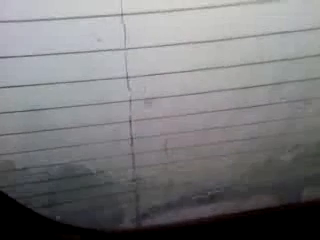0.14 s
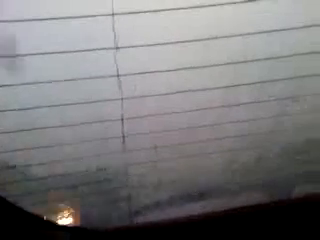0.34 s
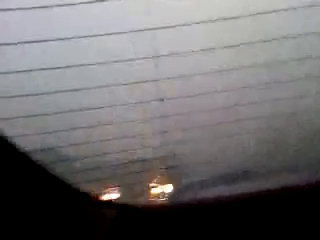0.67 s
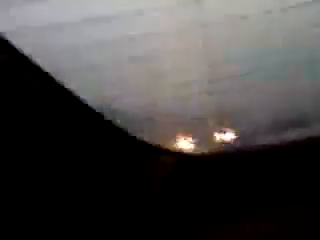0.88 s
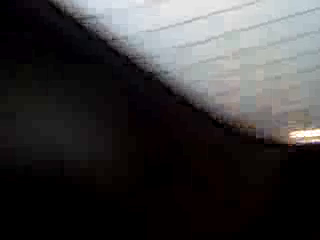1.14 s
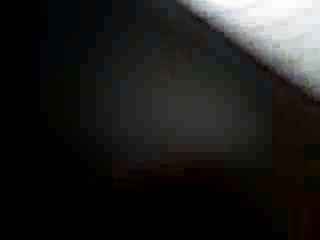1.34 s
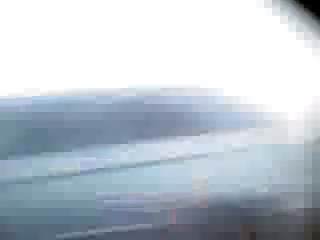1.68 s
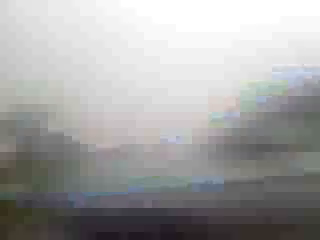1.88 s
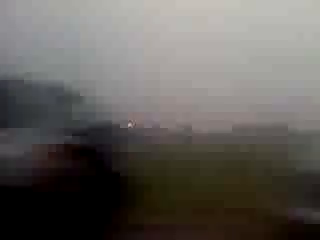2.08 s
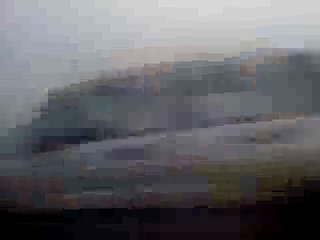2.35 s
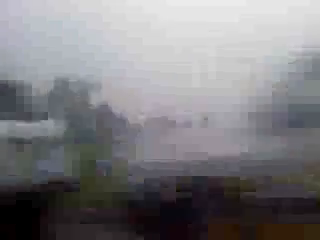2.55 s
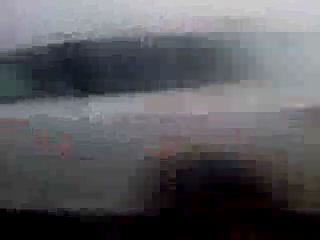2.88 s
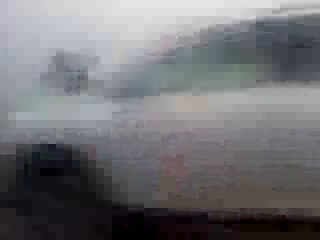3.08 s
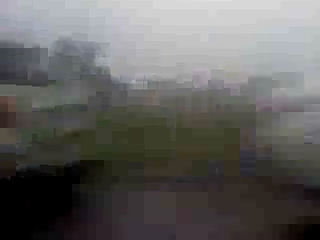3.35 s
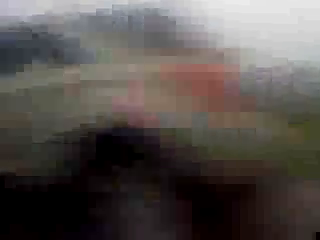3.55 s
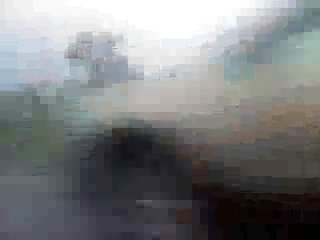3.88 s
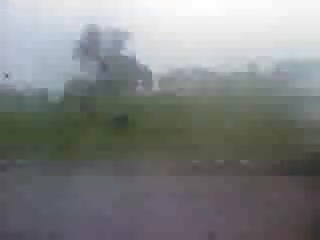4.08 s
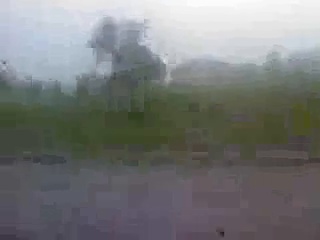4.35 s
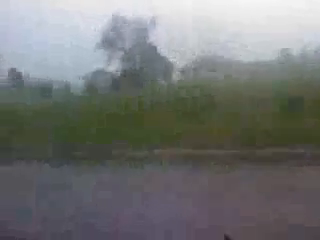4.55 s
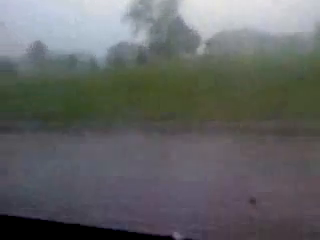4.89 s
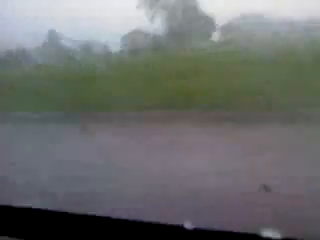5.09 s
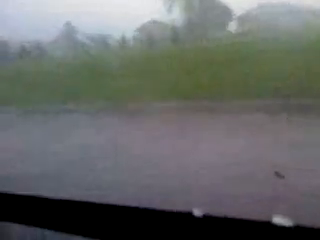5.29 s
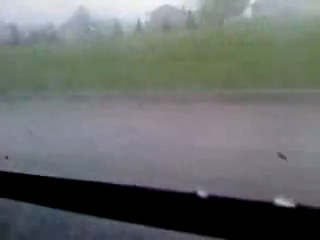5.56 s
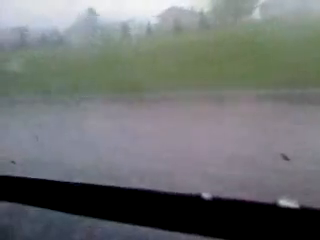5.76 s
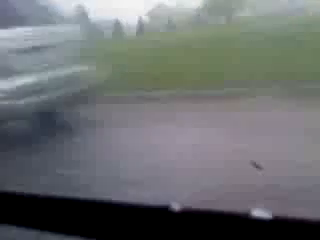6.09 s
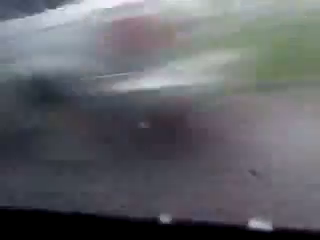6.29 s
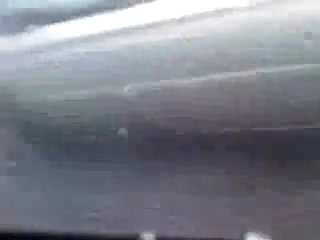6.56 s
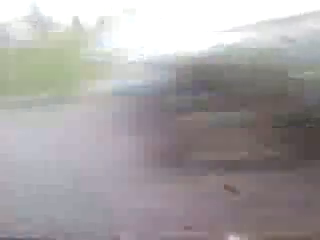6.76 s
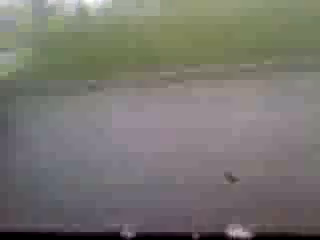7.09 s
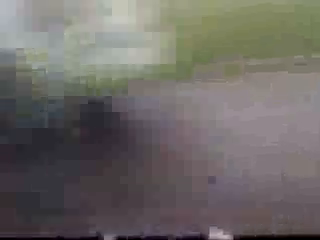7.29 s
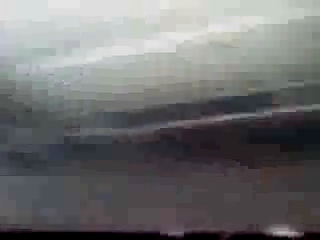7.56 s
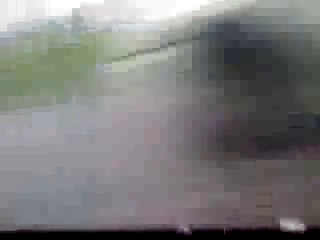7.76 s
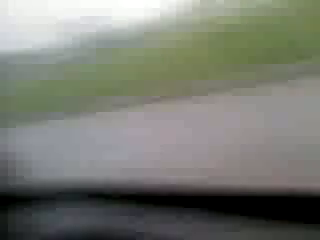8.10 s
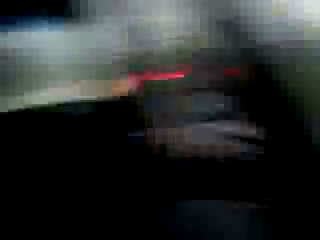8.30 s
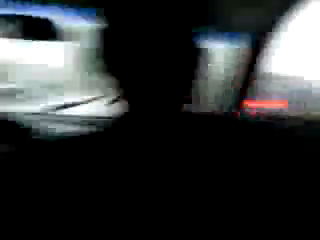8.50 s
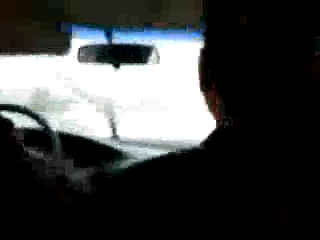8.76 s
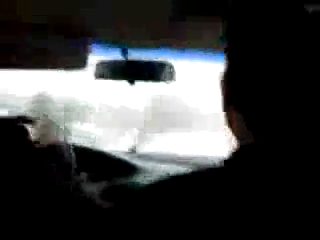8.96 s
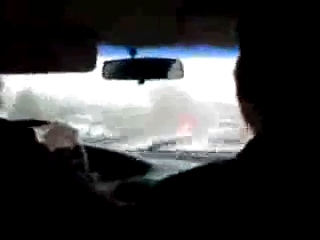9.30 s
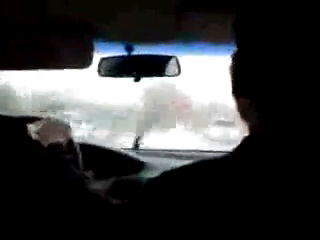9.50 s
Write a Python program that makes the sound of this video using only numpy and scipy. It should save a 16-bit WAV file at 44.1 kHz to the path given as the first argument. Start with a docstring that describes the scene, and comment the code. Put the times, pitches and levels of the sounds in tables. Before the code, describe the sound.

Inside a car during hail: dense, irregular hard clacks on window and roof, around twenty a second, some sharp and bright, others dull thuds that leave the sheet metal humming briefly. Tiny pellets patter in between. Beneath lies a fluttering rain hiss with low road rumble. The microphone sits in the small, boxy cabin; the sound is dull, with little high treble, and the hardest hits crackle slightly.

```python
"""Hail and rain on a car

Heard inside the car, dull and narrow in band. Each stone clacks on glass or roof as
a noise burst shaped by spectrum and decay, and sets a low sine mode of the sheet metal humming.
Resonators and a noise tail make the cabin ring briefly. Small random pellets patter in between,
over one filtered, fluttering noise that holds both the hiss of rain and a low road rumble."""
import sys
import numpy as np
from scipy import signal
from scipy.fft import rfft, irfft, next_fast_len
from scipy.io import wavfile
from scipy.ndimage import uniform_filter1d

SR = 44100
rng = np.random.default_rng(int(sys.argv[2]) if len(sys.argv) > 2 else 0)


def waveform_to_disk(signal):
    """Save audio, clipped to [-1, 1], as 16-bit WAV at the path in sys.argv[1]."""
    frames = np.transpose(np.atleast_2d(signal))
    scaled = np.clip(frames, -1, 1) * 32767
    samples = np.round(scaled).astype(np.int16)
    wavfile.write(sys.argv[1], SR, samples)


N = 425106
STEP = 4  # the layers run at a quarter of SR, as next to nothing sounds above 4.75 kHz
RATE = SR / STEP
SLOW_N = N // STEP + 1


def amp(db):
    """Decibels to gain."""
    return 10 ** (np.asarray(db) / 20)


def evened(x):
    """Scales to rms 1."""
    return x / np.sqrt(np.mean(x ** 2) + 1e-20)


def read(points, hz):
    """Reads a (f/Hz, value) table on a log-frequency axis."""
    f, value = np.transpose(points)
    return np.interp(np.log(hz + 1), np.log(f + 1), value)


def coloured(x, points, rate):
    """Filters by a (f/Hz, gain/dB) table."""
    size = next_fast_len(len(x) + 4096)
    gain = amp(read(points, np.fft.rfftfreq(size, 1 / rate)))
    return irfft(rfft(x, size) * gain, size)[:len(x)]


def add(mix, s, sound):
    """Mixes a sound in at time s, trimmed to the ends of the mix."""
    start = round(s * RATE)
    sound = sound[max(-start, 0):]
    part = mix[max(start, 0):][:len(sound)]
    part += sound[:len(part)]


def wobble(size, span):
    """Smooth chance of rms 1 that changes over about span samples."""
    spectrum = rfft(rng.standard_normal(size))
    smoothing = np.exp(-(np.fft.rfftfreq(size) * span) ** 2)
    return evened(irfft(spectrum * smoothing, size))


def blows(rows, clack_width_hz=1080, skirt=3.32, thud_hz=253, thud_width_hz=250,
          spread=0.19, direct_level=0.12, swell=1.954, fall=1.28, lag_s=0.002,
          push_db=-8, push_hz=110, attack_s=0.00029, clump=0.36, clump_s=0.0034,
          patchy_db=3.5, patch_hz=330, size=1536, count=18):
    """Each stone launches bending waves that return from the panel edges as a burst of uneven echoes."""
    t, hz = np.arange(1, size + 1) / RATE, np.fft.rfftfreq(size, 1 / RATE)
    # overlapping bands, each with its own decay
    centres = np.geomspace(150, 4400, count)
    bands = np.array([np.interp(hz, centres, row) for row in np.eye(count)])
    centres = centres[:, None]

    # low bending waves travel slower: they swell later and last longer, so each blow sweeps downward
    # below 1500 Hz they also set in later, by the square root of their period
    travel = np.maximum(np.sqrt(1500 / centres) - 1, 0)
    arrived = np.maximum(t - lag_s * travel, 0)
    slowed = arrived * (centres / 2000) ** spread
    rising, falling = slowed ** swell, slowed ** fall
    onset = 1 - np.exp(-t / attack_s)
    # the treble arrives at once, straight from the point of contact
    direct = direct_level * np.minimum(centres / 2000, 1)

    mix = np.zeros(SLOW_N)
    for s, db, clack_hz, thud_db, ring in rows:
        # the echoes arrive in clumps a millisecond or two long
        echoes = rng.choice([-1, 1], size) * np.exp(clump * wobble(size, clump_s * RATE))
        # a short, hard contact clacks high; a heavy stone also pushes the whole panel
        clack = (1 + ((hz - clack_hz) / clack_width_hz) ** 2) ** -skirt
        thud = amp(thud_db) ** 2 / (1 + ((hz - thud_hz) / thud_width_hz) ** 2)
        # the deepest bass is the momentum of the stone alone, whatever the thud of the panel
        deep = 1 / (1 + (hz / push_hz) ** 2)
        push = deep ** 2 * amp(push_db) ** 2
        colour = bands * np.sqrt(clack + (1 - deep) * thud + push)
        # every landing spot favours its own groups of modes
        spot = amp(patchy_db * wobble(len(hz), patch_hz / hz[1]))

        decay = np.exp(-np.minimum(falling / ring ** fall, 50))
        life = onset * np.sqrt((direct + rising / ring ** swell) * decay)
        sound = (irfft(colour * spot * rfft(echoes), size) * life).sum(0)
        # set the level from the expected power, so chance does not change the strength
        power = (colour * colour.sum(0)).mean(1) @ (life ** 2).mean(1)
        add(mix, s, amp(db) * np.sqrt(power) * evened(sound))
    return mix


def roof(rows, db=-10, limit_db=-8, build_s=.011, lag_s=.006, size=2400):
    """Each thud leaves a low roof mode humming; the stiff sheet yields little more to the heaviest."""
    # low modes of the roof, one drawn for each landing spot: (f/Hz, t60/s)
    roof_modes = [(236, 0.13), (252, 0.27), (280, 0.13), (303, 0.34), (314, 0.2), (330, 0.1), (352, 0.2),
                  (406, 0.038), (466, 0.12), (502, 0.081)]
    t, mix = np.arange(size) / RATE, np.zeros(SLOW_N)
    for (s, stone_db, _, thud_db, _), (spot, phase) in zip(rows, rng.random((len(rows), 2))):
        hz, t60 = roof_modes[int(spot * len(roof_modes))]
        ringing = np.sin(2 * np.pi * (hz * t + phase)) * amp(-60 * t / t60)
        swing = amp(limit_db) * np.tanh(amp(stone_db + thud_db - limit_db))
        add(mix, s + lag_s, amp(db) * swing * (1 - np.exp(-t / build_s)) * ringing)
    return mix


def pellets(per_s=34, low_hz=1700, high_hz=3630, db=-34.5, scatter_db=3.5, thud_db=-10, ring=0.0055):
    """Small ice grains land at random, each with its own clack; the larger they are, the rarer."""
    count = int(per_s * N / SR)
    when, chance, pitch = rng.random((count, 3)).T
    grain = np.minimum(-np.log(1 - chance), 2)
    clack_hz = low_hz + (high_hz - low_hz) * pitch
    same = np.ones(count)
    return np.transpose([when * N / SR, db + scatter_db * grain, clack_hz, thud_db * same, ring * same])


def boom(x):
    """The air under the roof rings on at its low modes after the blows."""
    # resonances of the cabin air: (f/Hz, width/Hz, level/dB)
    air_modes = [(254, 49, -16.5), (312, 50, -6.5), (504, 53, -4)]
    mix = np.zeros(len(x))
    for hz, width, db in air_modes:
        b, a = signal.iirpeak(hz, hz / width, fs=RATE)
        mix += amp(db) * signal.lfilter(b, a, x)
    return mix


def cabin(x, size=4096, build_s=0.0015):
    """A short, dense tail of noise, soaked up by the seats at a rate that depends on frequency."""
    # reverberation time of the cabin: (f/Hz, t60/s)
    cabin_t60 = [(150, 0.25), (400, 0.13), (1200, 0.031), (3500, 0.046)]
    hz, t, z = signal.stft(rng.standard_normal(size), RATE, nperseg=64)
    decay = amp(-60 * t / read(cabin_t60, hz)[:, None])
    tail = signal.istft(z * decay, RATE)[1]
    tail *= 1 - np.exp(-np.arange(len(tail)) / RATE / build_s)
    return signal.fftconvolve(x, tail / np.linalg.norm(tail))[:len(x)]


def rain(flutter_db=4.55):
    """Countless drops merge into a fluttering hiss; the same noise holds the rumble of the road."""
    # spectrum of rain and road, relative: (f/Hz, density/dB)
    wash_tone = [(25, -3.5), (80, -9), (160, -1), (290, 3.5), (450, -3.5), (800, -7.5), (1400, -2.5),
                 (2100, -1), (2800, -1.5), (3400, -2), (4000, -9)]
    # strength of this wash before flutter: (t/s, level/dB)
    rain_level = [(0, -36.5), (1.501, -37.5), (1.8, -39), (3.2, -38.5), (5, -36), (6.8, -37), (7.601, -40),
                  (8.75, -39), (9.3, -44.5), (9.64, -39.5)]
    sizes = np.exp(.45 * rng.standard_normal(SLOW_N))
    drops = sizes * rng.standard_normal(SLOW_N)
    flutter = evened(uniform_filter1d(rng.standard_normal(SLOW_N), size=250))  # over about 23 ms
    level_db = np.interp(np.arange(SLOW_N) / RATE, *np.transpose(rain_level))
    return evened(coloured(drops, wash_tone, RATE)) * amp(level_db + flutter_db * flutter)


def scene():
    """Stones and pellets sound through the car body, over the rain."""
    # one row a hailstone, before the body colours it:
    # (t/s, strength/dB, clack centre f/Hz, panel thud re clack level/dB, ring time at 2 kHz t/s)
    stones = [(-0.005, -17, 496, 20, 0.009), (0.02, -11, 1300, 4.5, 0.015),
              (0.061, -10.5, 2750, -4.5, 0.01), (0.14, -10.5, 2700, -6, 0.01),
              (0.211, -11.5, 1620, -11, 0.0098), (0.22, -12.5, 2920, -22, 0.015),
              (0.312, -10.5, 2780, -3.5, 0.0099), (0.368, -7.5, 1900, -17, 0.011),
              (0.426, -10, 3040, 1, 0.0099), (0.502, -7, 2100, -4, 0.011), (0.525, -1.5, 3070, -18, 0.0058),
              (0.548, -23, 750, 15, 0.0096), (0.564, -11, 2800, -17.5, 0.0065),
              (0.591, -15, 2930, -9.5, 0.014), (0.63, -7.5, 3180, -3, 0.017),
              (0.657, -7.5, 1700, -30, 0.011), (0.722, -11.5, 3100, -3, 0.0094),
              (0.744, -12.5, 1600, 11.5, 0.015), (0.766, -19, 3070, -2.5, 0.021),
              (0.881, -6.5, 2390, -1, 0.018), (0.947, -7.5, 3100, -6, 0.005), (0.996, -9, 2760, -8, 0.024),
              (1.061, -10, 2440, 7.5, 0.013), (1.153, -10.5, 2840, 4.5, 0.004),
              (1.159, -8, 2650, -6.5, 0.019), (1.214, -4, 2270, -2.5, 0.0052),
              (1.225, -11.5, 3130, -5, 0.014), (1.28, -2.5, 2750, -5.5, 0.02),
              (1.389, -10.5, 2050, 3.5, 0.019), (1.462, -8, 2190, -2.5, 0.008),
              (1.509, -8, 2010, -6, 0.015), (1.546, -4, 1930, -4, 0.0061), (1.571, -7.5, 3070, -28, 0.0095),
              (1.59, -3, 1360, -12, 0.005), (1.599, -7, 2440, 1.5, 0.014), (1.646, -6, 2200, -25, 0.011),
              (1.663, -5.5, 3100, 1, 0.01), (1.752, -10.5, 2725, -28, 0.0049),
              (1.793, -15, 2140, 1.5, 0.0082), (1.867, -5.5, 1860, -10.5, 0.015),
              (1.905, -2.5, 2250, -4.5, 0.01), (1.962, -10, 1900, 5.5, 0.0092),
              (2.009, -13, 2450, -1, 0.013), (2.028, -3, 2210, -19, 0.0089),
              (2.108, -10, 2460, -13.5, 0.017), (2.124, -6, 3070, -18, 0.01),
              (2.201, -7, 2330, -3.5, 0.0099), (2.252, -9.5, 2700, -27, 0.007),
              (2.294, -13.5, 2210, -21, 0.014), (2.357, -4.5, 2430, -30, 0.012),
              (2.383, -10.5, 3450, 3, 0.0081), (2.42, -7, 2940, 5, 0.0018),
              (2.432, -11.5, 2320, 9.5, 0.0048), (2.442, -9.5, 2130, -12.5, 0.012),
              (2.494, -10, 1980, 7, 0.0086), (2.547, -13.5, 2600, -11, 0.0077),
              (2.593, -8, 1920, -11, 0.019), (2.634, -4, 2350, -2, 0.01), (2.697, -14, 2300, 0.5, 0.013),
              (2.776, -10, 2800, -25, 0.0098), (2.806, -10.5, 2430, 1.5, 0.0083),
              (2.847, -8.5, 2370, -36, 0.007), (2.898, -13, 2630, -4.5, 0.0042),
              (2.911, -8, 2200, -9.5, 0.0094), (2.961, -6, 2200, -21, 0.0083),
              (2.984, -3.0, 3000, -10.5, 0.014), (3.108, -8.5, 2330, -1, 0.007),
              (3.155, -11, 2910, -9.5, 0.013), (3.3, -11, 2940, -22, 0.0034),
              (3.327, -13, 2550, -8, 0.0086), (3.387, -10.5, 2220, 0, 0.013),
              (3.449, -5.5, 2540, -15, 0.013), (3.511, -3, 2126, -22.5, 0.015),
              (3.584, -14.5, 2730, -5, 0.0058), (3.638, -9, 2440, -16, 0.0059),
              (3.652, -10.5, 2750, -13, 0.011), (3.69, -4, 2920, -12.5, 0.0062),
              (3.736, -12.5, 2390, -19, 0.004), (3.759, -14, 1950, -3, 0.0071),
              (3.786, -3, 2650, -24, 0.006), (3.82, -11.5, 2840, -22.5, 0.012),
              (3.842, -10, 2470, -24, 0.01), (3.888, -16.0, 2550, -7.5, 0.016),
              (3.939, -9, 2120, -15, 0.0064), (3.972, -11, 2600, -19, 0.007),
              (4.009, -13.5, 2350, -16.5, 0.006), (4.056, -11.5, 2550, -4, 0.0066),
              (4.093, -4.5, 2320, -29, 0.0031), (4.107, -2, 2110, -3, 0.0082),
              (4.108, -19, 2330, 11, 0.021), (4.203, -16.5, 2480, -0.5, 0.008),
              (4.247, -7.5, 2730, -8, 0.009), (4.295, -5, 2630, -15, 0.0055),
              (4.317, -6.5, 2460, -22.5, 0.0099), (4.363, -4, 2240, -21.5, 0.007),
              (4.39, -3, 2420, -16, 0.0099), (4.48, -15.5, 2780, 0, 0.008), (4.518, -8, 1840, -5.5, 0.012),
              (4.554, -11.5, 2350, -28, 0.011), (4.597, -14, 3250, -24, 0.017),
              (4.625, -9.5, 1950, -20, 0.007), (4.641, -23, 2160, 9, 0.01), (4.709, -12.0, 2500, -7, 0.003),
              (4.746, -8.0, 2610, -12.5, 0.006), (4.848, -9.5, 2050, 2, 0.013),
              (4.859, -9, 2310, -15, 0.012), (4.921, -11.5, 2670, -15, 0.0051),
              (4.995, -10.0, 2350, -7, 0.014), (5.087, -9, 2630, -13, 0.012),
              (5.117, -8, 2720, -5.5, 0.0057), (5.168, -10.0, 2570, -25.5, 0.003),
              (5.194, -14, 2350, -20, 0.008), (5.23, -9, 1970, -26.5, 0.0085), (5.249, -7, 2340, -5, 0.016),
              (5.343, -10.5, 2490, 2.5, 0.0082), (5.437, -4.5, 2650, -11.5, 0.0076),
              (5.482, -10.5, 2320, -5.5, 0.011), (5.595, -10, 2790, -13, 0.008),
              (5.641, -13, 2570, -7, 0.0072), (5.676, -14, 2190, -1.5, 0.013), (5.721, -8, 2300, -7, 0.011),
              (5.76, -9.5, 2580, -3, 0.0044), (5.797, -5, 2830, -13, 0.01), (5.882, -7.5, 1810, 0.5, 0.011),
              (5.979, -4.5, 2380, -29, 0.0059), (6.021, -1, 2480, -19, 0.0019),
              (6.081, -3.5, 2250, -12, 0.0077), (6.118, -15, 2630, -6, 0.0098),
              (6.176, -10, 2030, -11, 0.0066), (6.223, -11, 2570, -5.5, 0.019),
              (6.276, -13.5, 2620, -13.5, 0.011), (6.296, -1.5, 2150, -30, 0.0059),
              (6.297, -12, 602, -29, 0.013), (6.371, -8.5, 2450, -15, 0.0092),
              (6.42, -11.5, 2630, -9.5, 0.0066), (6.474, -9.0, 2510, -30, 0.0075),
              (6.527, -13.5, 2330, 0.5, 0.019), (6.573, -2.5, 2330, -14, 0.0059),
              (6.613, -13.5, 2800, -11, 0.0088), (6.697, -3.5, 2710, -6, 0.005),
              (6.717, -10.5, 2170, -10.5, 0.0094), (6.759, -10.5, 2050, -13, 0.012),
              (6.796, -9, 2170, -20.5, 0.0068), (6.864, -8.5, 2300, -12, 0.012),
              (6.879, -15.5, 3350, 6, 0.0072), (6.921, -9.0, 1950, -9, 0.0079),
              (6.976, -7.5, 1980, -2, 0.0086), (7.022, -9.5, 2080, 2, 0.0069), (7.05, -9, 2440, -6, 0.0087),
              (7.07, -10.5, 2890, -1, 0.012), (7.105, -2.5, 1900, -34, 0.0064),
              (7.124, -21, 2050, 17, 0.0052), (7.167, -11.5, 2550, -24, 0.015),
              (7.192, -12.5, 2590, 0, 0.023), (7.226, -5.5, 984, -24, 0.0092),
              (7.305, -11.5, 2570, -7.5, 0.019), (7.384, -22.5, 2130, 12, 0.013),
              (7.449, -12.0, 2170, -9, 0.0063), (7.492, -8.0, 1980, -10.5, 0.0095),
              (7.662, -19, 1350, 2.5, 0.0078), (7.744, -15.5, 2200, 3.5, 0.024),
              (7.756, -4, 1284, -10.5, 0.014), (7.829, -4.5, 2310, -28, 0.016),
              (7.88, -11.0, 2720, -1, 0.0094), (7.937, -18, 2180, 7, 0.0092),
              (8.01, -10.5, 2760, -2.5, 0.016), (8.106, -10.5, 2530, -2.5, 0.0093),
              (8.211, -11, 3150, -6.5, 0.0055), (8.251, -13.5, 2920, -1.5, 0.016),
              (8.273, -11, 503, 8.5, 0.008), (8.304, -12.0, 2950, -29, 0.013),
              (8.33, -15, 1710, 5.5, 0.011), (8.417, -8, 2380, -7.5, 0.013),
              (8.462, -3.5, 1990, -15, 0.0085), (8.476, -8, 650, -4, 0.01),
              (8.572, -9.5, 2780, -14, 0.0047), (8.653, -15, 3050, -11, 0.0083),
              (8.875, -12, 2530, -11.5, 0.0059), (8.909, -15.0, 2450, -26, 0.0077),
              (8.932, -9.5, 2620, -9, 0.0074), (8.94, -8.5, 500, -10.5, 0.0087),
              (8.999, -8.5, 2340, -1.5, 0.013), (9.034, -5.5, 2700, -1.5, 0.0082),
              (9.087, -9.5, 2480, -1, 0.015), (9.125, -7.5, 2740, -19, 0.0093),
              (9.237, -8.5, 3090, -19, 0.0055), (9.335, -8, 3120, -31.5, 0.0046),
              (9.363, -11.5, 2570, -8, 0.0082), (9.419, -8.5, 1770, 3, 0.0091),
              (9.471, -9, 2230, 2.5, 0.0077), (9.532, -10.5, 2750, -8, 0.007),
              (9.559, -16.5, 1540, 6.5, 0.0068), (9.562, -9.5, 3010, -22, 0.012),
              (9.594, -8, 3200, -11.5, 0.0067), (9.62, -19, 2800, 15.5, 0.017)]
    # how body and trim colour every blow: (f/Hz, gain/dB)
    body_tone = [(30, -8), (90, -8), (160, -8), (210, -2), (260, -1), (340, 2), (490, 2.5), (950, 4.5),
                 (1550, 3.5), (2150, 3.5), (2700, 0), (3050, 2), (3380, 8.5), (3750, 7)]
    struck = blows(list(stones) + list(pellets()))
    hail = coloured(struck, body_tone, RATE) + roof(stones)
    inside = hail + boom(hail) + amp(-17) * cabin(hail) + rain()
    return signal.resample_poly(inside, STEP, 1)[None, :N]


def record(dry, ceiling=.71, edge_hz=15850):
    """The treble falls away above 3.5 kHz; the hardest peaks clip with a thin tick."""
    # overall tone, with its treble roll-off: (f/Hz, gain/dB)
    overall_tone = [(20, -1.5), (3300, 1.5), (3550, -3), (3800, -10.5), (4000, -13), (4300, -18.5),
                    (4550, -26), (4750, -84), (6000, -100)]
    clipped = np.clip(coloured(dry[0], overall_tone, SR), -ceiling, ceiling)
    # a steep low-pass bounds the harmonics of the clipping
    lowpass = signal.firwin(511, edge_hz, window=("kaiser", 9), fs=SR)
    return signal.oaconvolve(clipped, lowpass, "same")[None]


dry = scene()
out = record(dry)
waveform_to_disk(out)
```